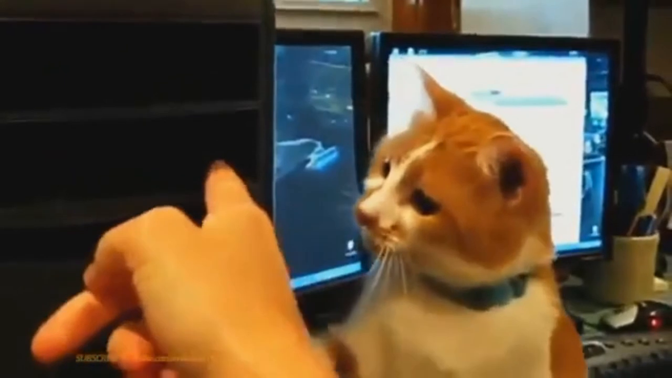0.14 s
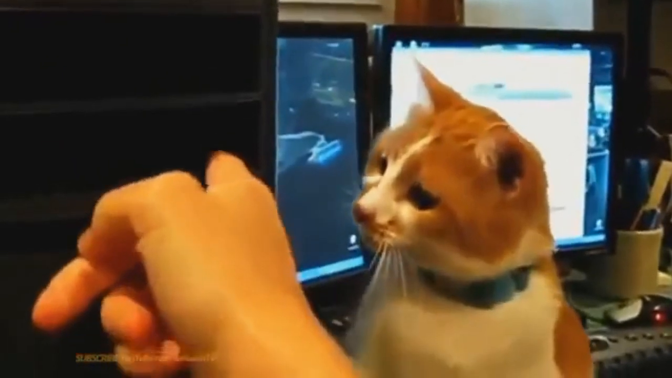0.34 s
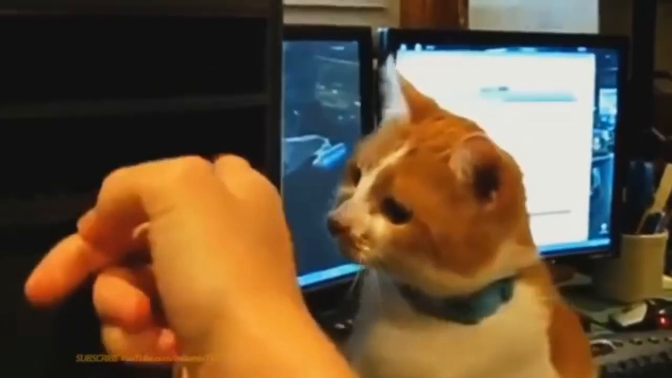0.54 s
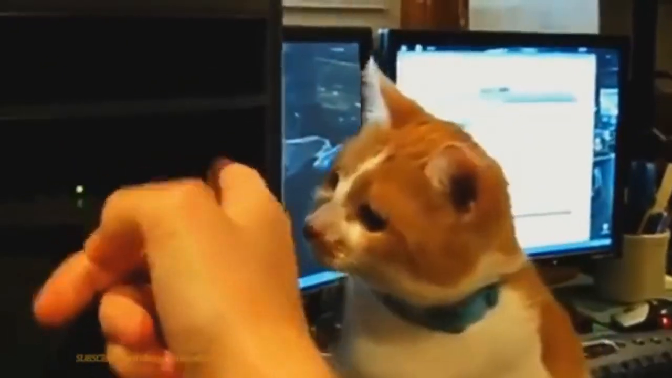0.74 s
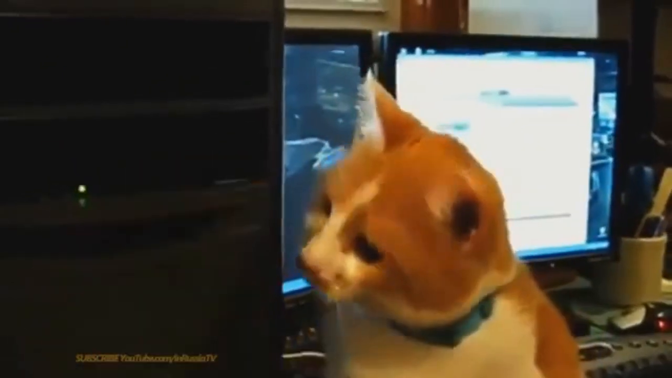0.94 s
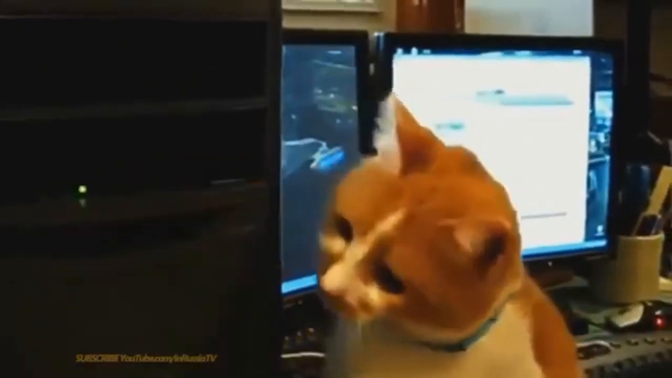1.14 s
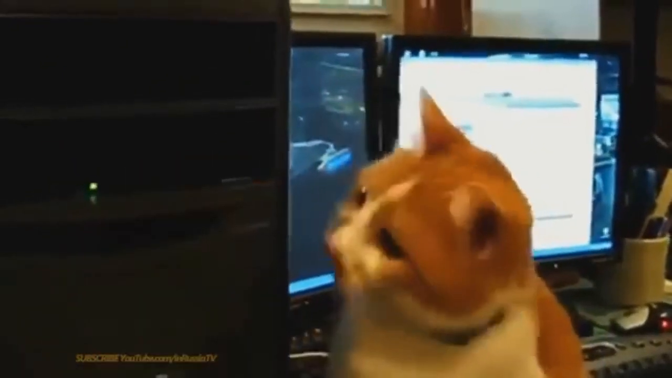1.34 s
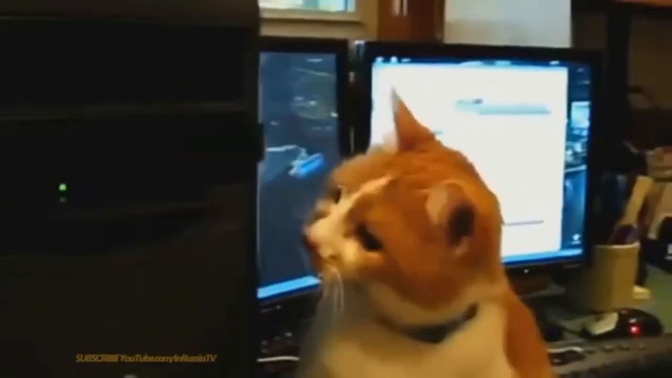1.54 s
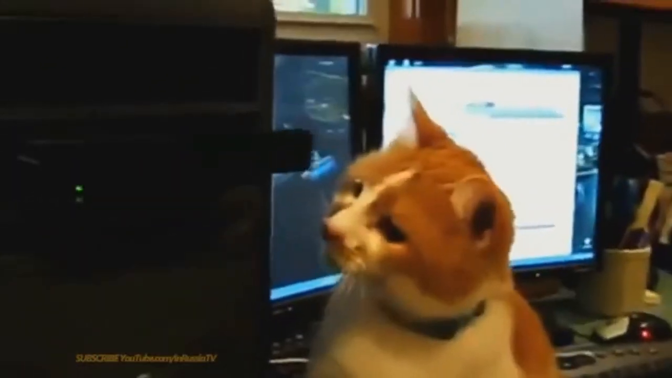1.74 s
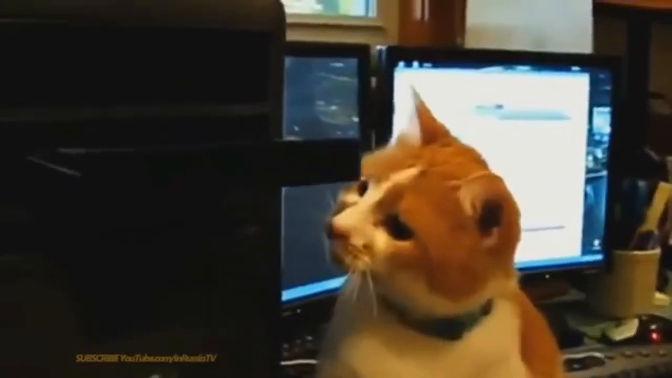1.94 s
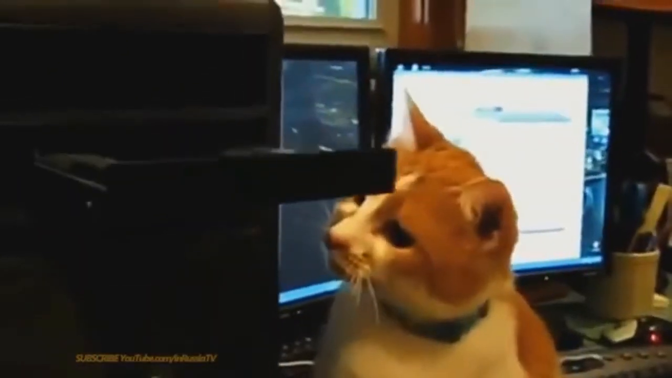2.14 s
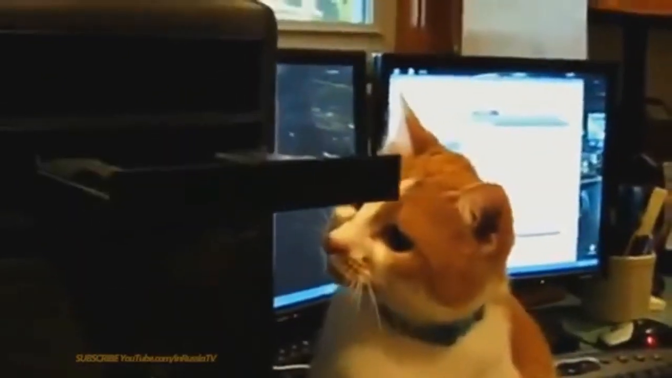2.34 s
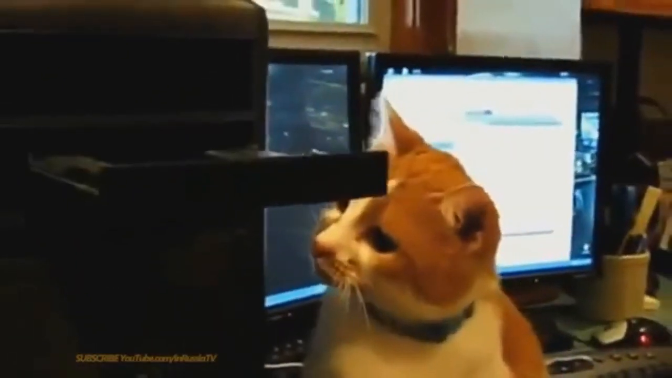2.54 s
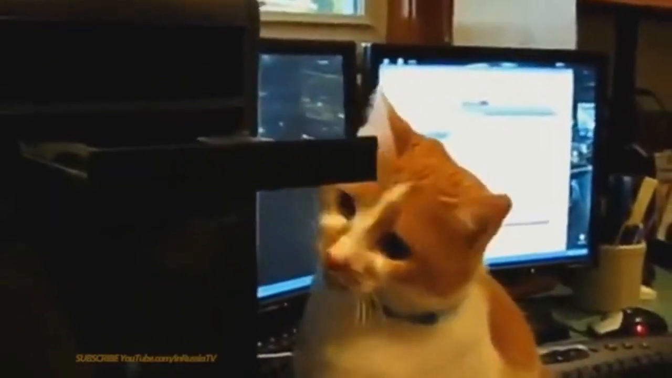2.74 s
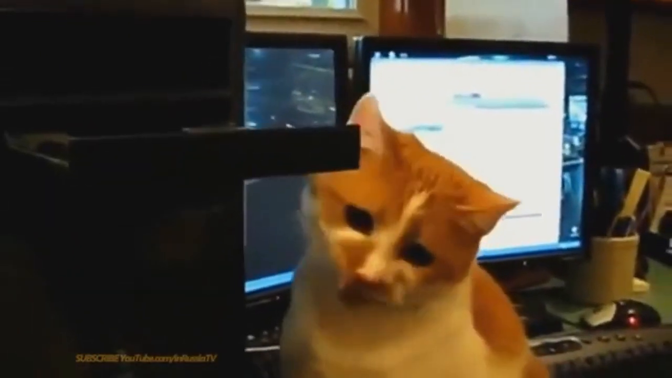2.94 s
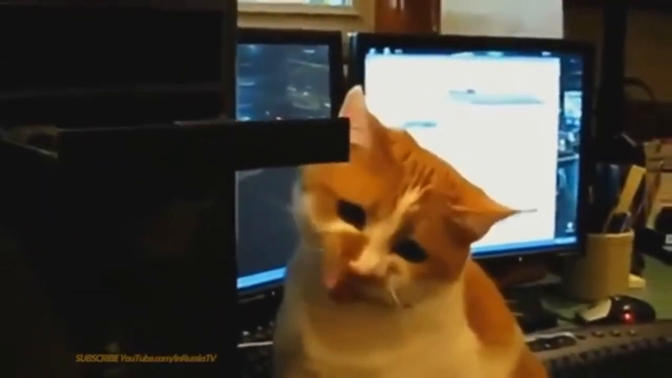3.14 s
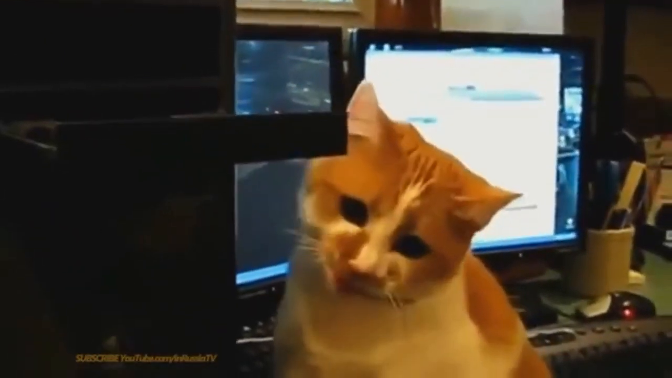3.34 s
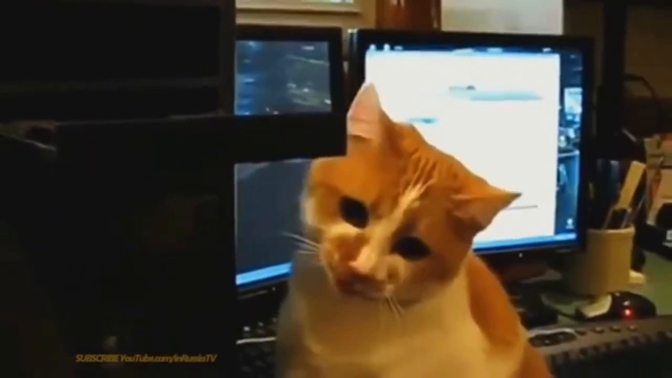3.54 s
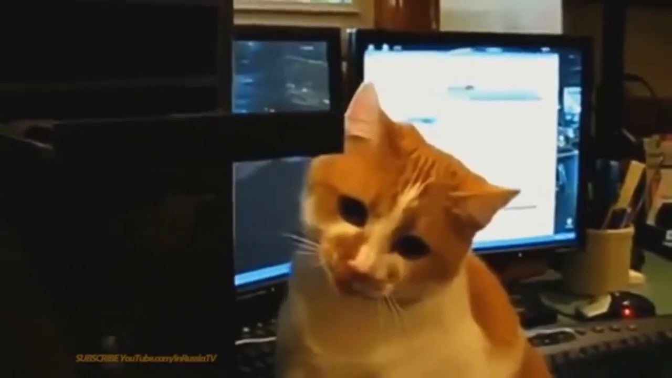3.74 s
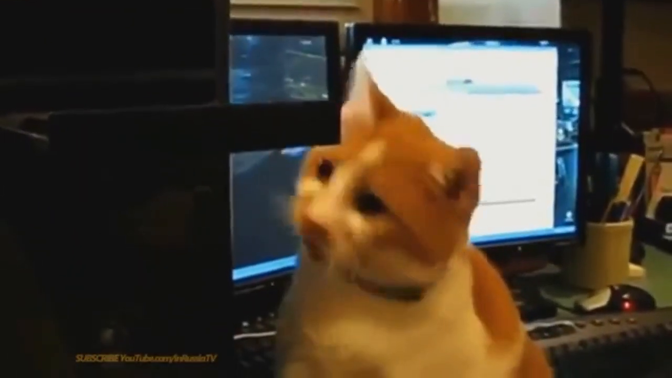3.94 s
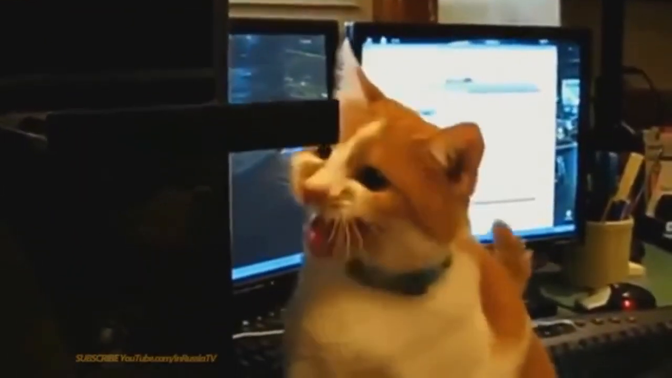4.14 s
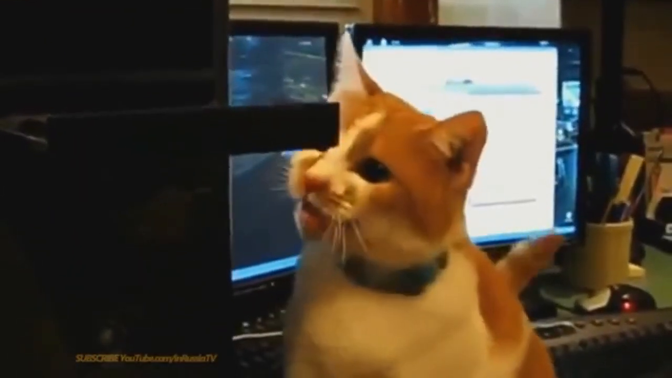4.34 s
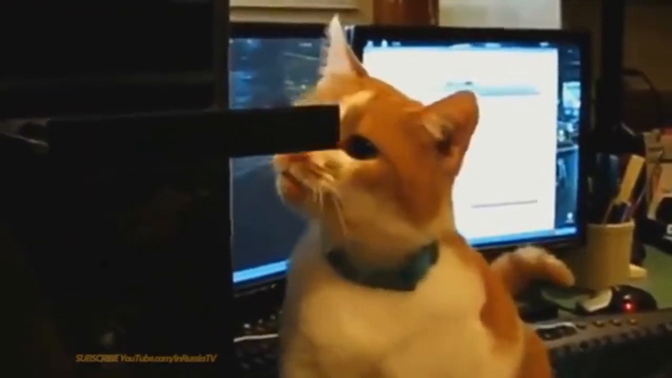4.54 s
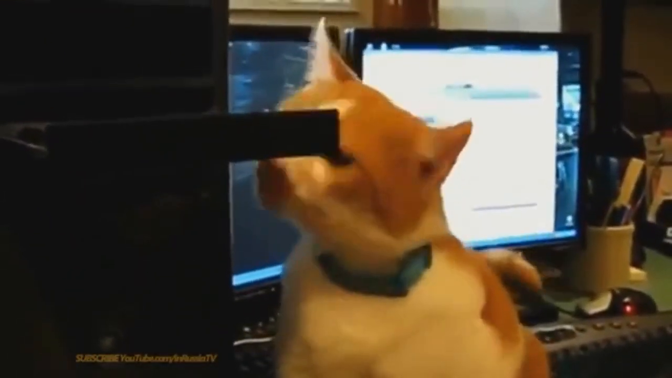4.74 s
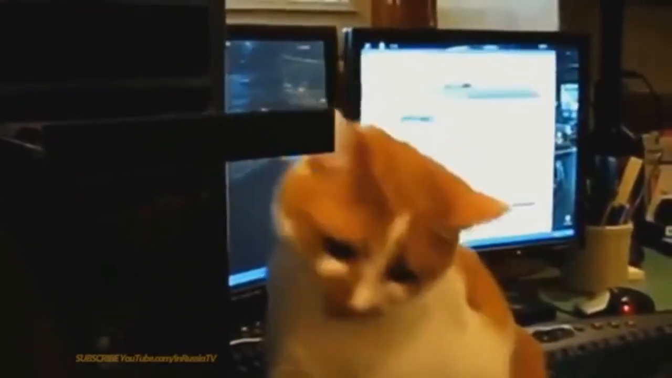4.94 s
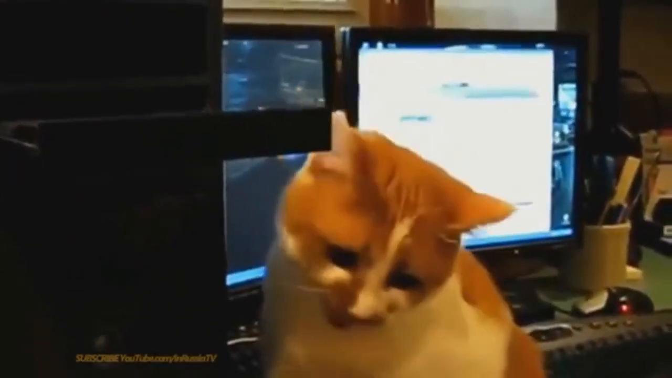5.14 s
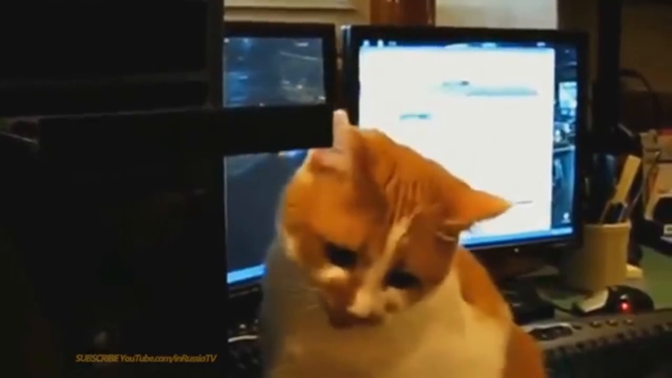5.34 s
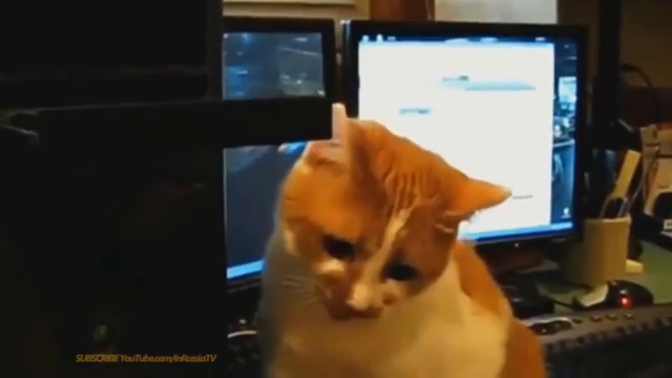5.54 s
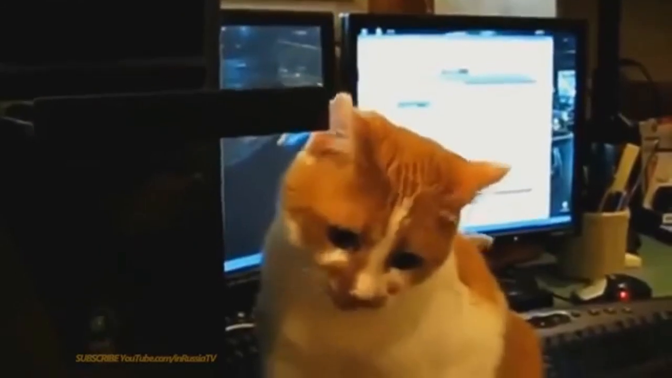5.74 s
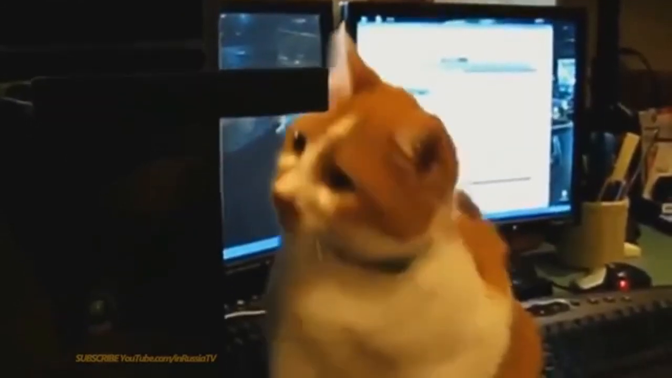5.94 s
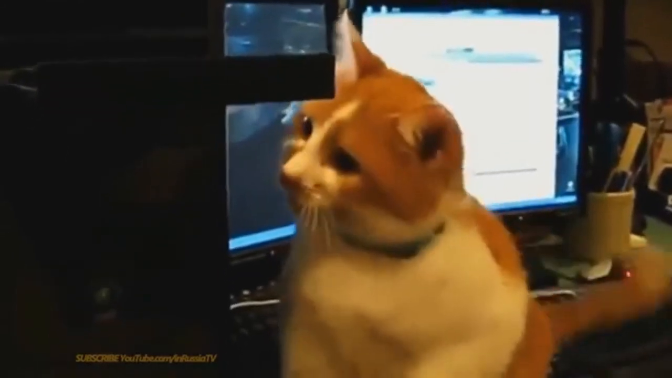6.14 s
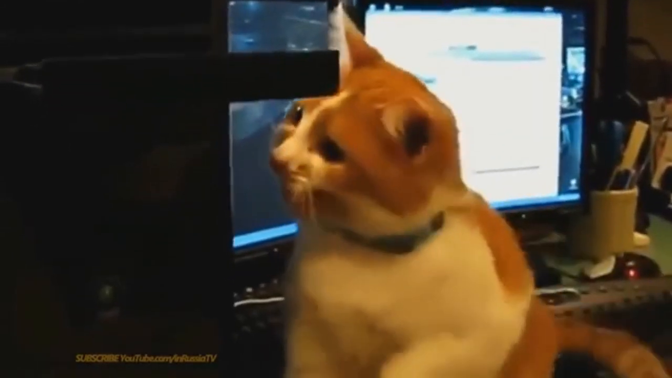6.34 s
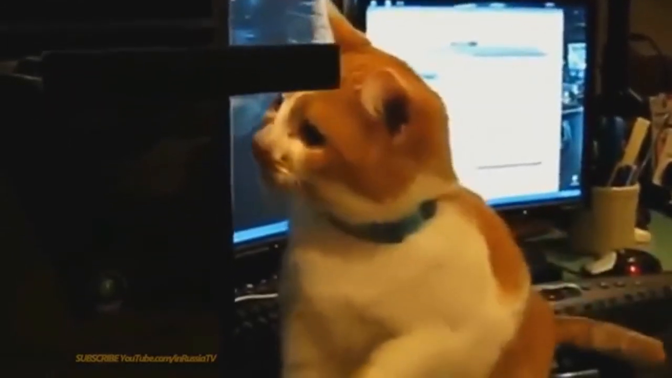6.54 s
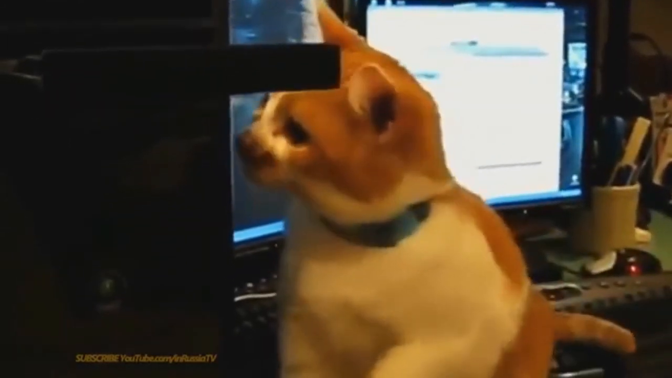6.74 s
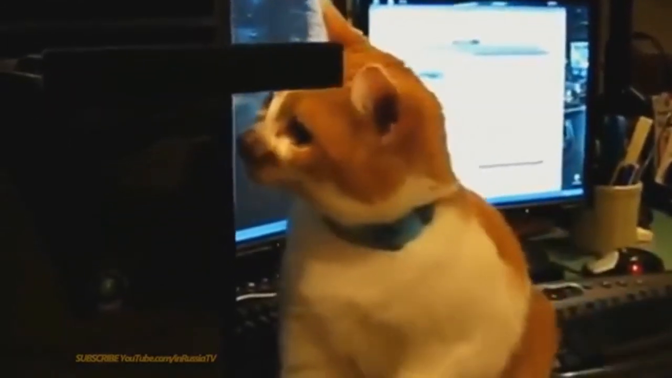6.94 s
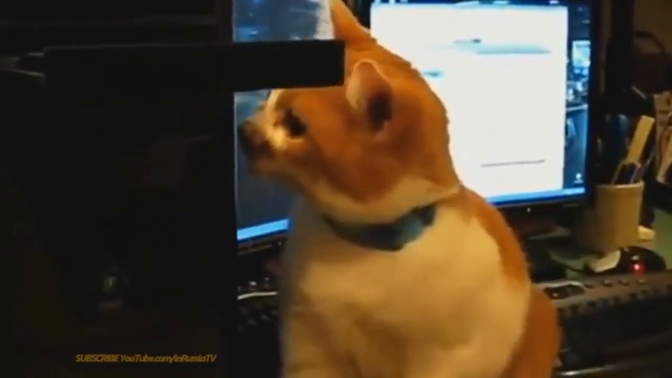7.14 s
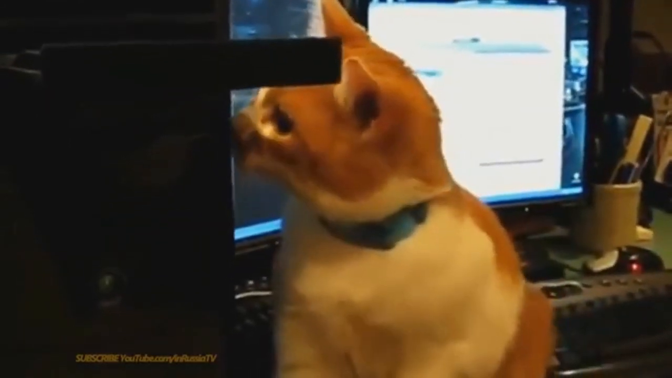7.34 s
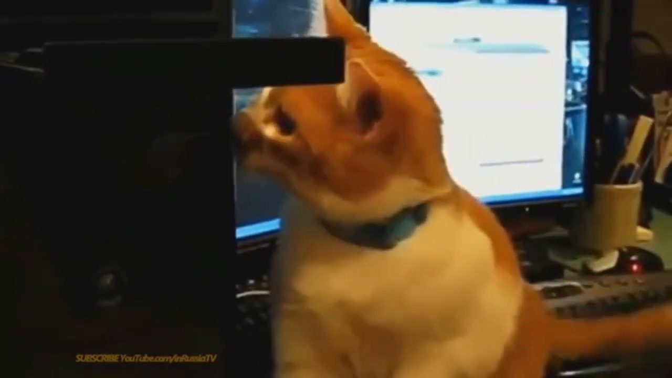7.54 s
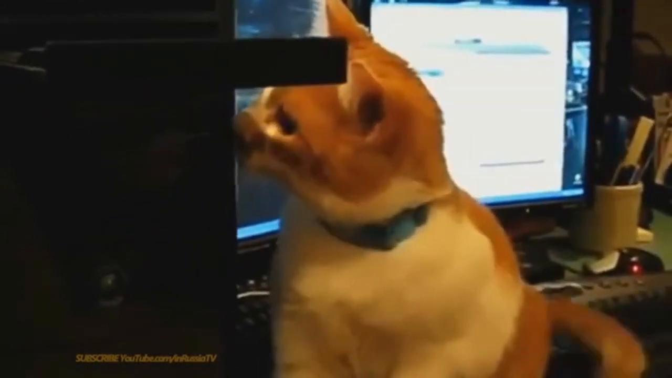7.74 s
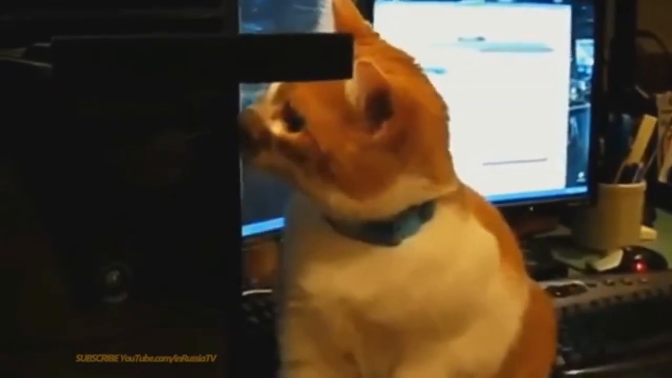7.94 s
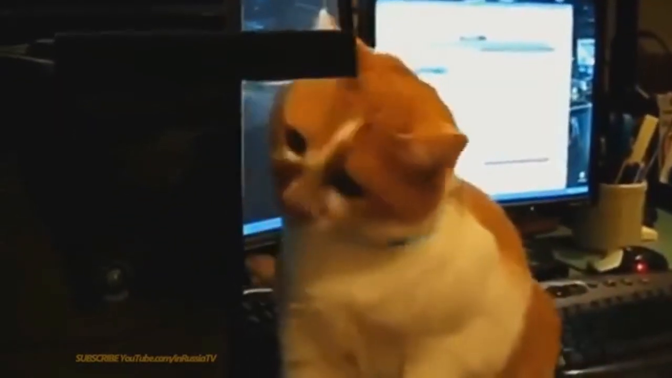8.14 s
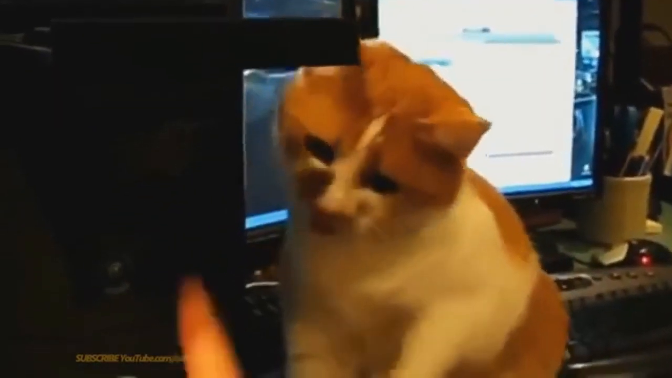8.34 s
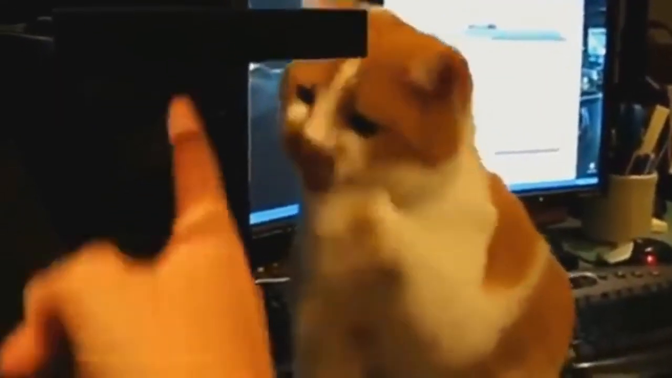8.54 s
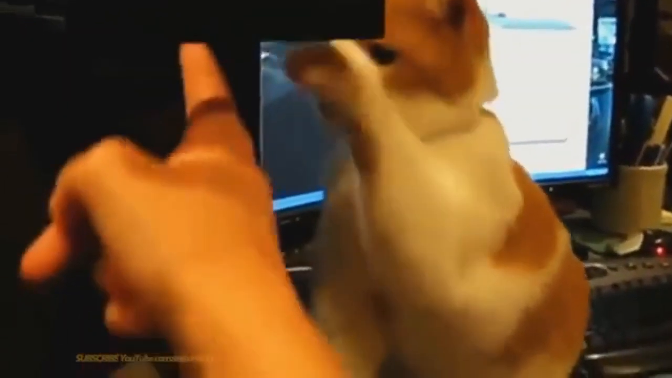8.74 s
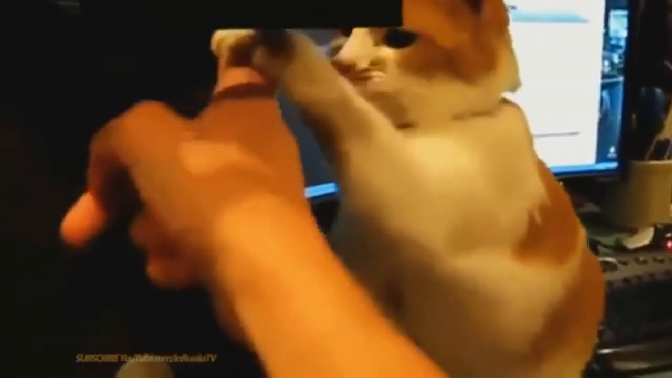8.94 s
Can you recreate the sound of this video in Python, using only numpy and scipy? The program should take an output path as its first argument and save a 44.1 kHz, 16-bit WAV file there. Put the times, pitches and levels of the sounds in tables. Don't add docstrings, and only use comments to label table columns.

```python
import sys
import numpy as np
from scipy import signal
from scipy.fft import rfft, irfft
from scipy.io import wavfile
from scipy.ndimage import uniform_filter1d

SR = 44100
rng = np.random.default_rng(int(sys.argv[2]) if len(sys.argv) > 2 else 0)


def how_loud(loudness_db):
    steps = np.asarray(loudness_db, float) / 20
    return 10 ** steps


def generate_wav(sig):
    pcm = np.round(np.clip(np.atleast_2d(sig).T, -1, 1) * 32767).astype(np.int16)
    wavfile.write(sys.argv[1], SR, pcm)


N = 395577

# (frequency [Hz], level per Hz [dB])
BREATH = [(1200, -21), (2500, 0), (3800, 2.5), (5500, -0.5), (6800, -10.5), (8500, -27)]


def evened(x):
    return x / np.sqrt(np.mean(abs(x) ** 2) + 1e-20)


def read(points, hz):
    f, value = np.transpose(points)
    return np.interp(np.log(hz + 1), np.log(f + 1), value)


def add(mix, s, sound):
    part = mix[round(s * SR):][:len(sound)]
    part += sound[:len(part)]


def coloured(size, points):
    hz = np.fft.rfftfreq(size, 1 / SR)
    return evened(irfft(rfft(rng.standard_normal(size)) * how_loud(read(points, hz)), size))


def wander(size, width_hz):
    step = rng.standard_normal(size) + 1j * rng.standard_normal(size)
    r = np.exp(-np.pi * width_hz / SR)
    return evened(signal.lfilter([1], [1, -2 * r, r * r], step))


def ring(hz, centre_hz, width_hz):
    return 1 / (1 + 2j * (hz - centre_hz) / width_hz)


def mew(rows, nose_db, upper_db, late_db, fade_db, palate_db):
    s, *columns = np.transpose(rows)
    t = np.arange(s[0], s[-1], 1 / SR)
    size, age = len(t), t - s[0]
    hz, chest_db, open_db, mouth_hz = (np.interp(t, s, c) for c in columns)
    mouth_db = chest_db + open_db
    nose_db = chest_db + nose_db - 0.32 * open_db + 10 * np.exp(-age / 0.037)
    upper_db = upper_db + 0.69 * (mouth_db + 30.5) + fade_db * age + late_db * np.exp(-age / 0.012)
    upper_hz = 4600 - 20 * open_db

    settling = np.exp(-age / .02)
    tremor = (0.0061 + 0.026 * settling) * wander(size, width_hz=126.0).real
    hz = hz * (1 + tremor + .008 * np.exp(-age / .004))
    order = np.arange(1, 13)[:, None]
    tone_hz = order * hz

    lips = 1 / (1 + (tone_hz / (1.35 * mouth_hz)) ** 12)
    mouth = ring(tone_hz, mouth_hz, 1180) ** 2 * lips * np.isin(order, [3, 4])
    sign = (-1.) ** order
    upper = abs(ring(tone_hz, upper_hz, 1300)) ** 2 * sign
    raised = 1 - .9 * np.exp(-age / .12)
    upper += raised * how_loud(palate_db) * abs(ring(tone_hz, 6400, 1100)) * sign
    voice_top = 1 / (1 + (tone_hz / 7000) ** 12) + how_loud(-6) * (tone_hz > 8300)
    upper *= voice_top * (order > 4)

    gains = how_loud(mouth_db) * mouth / np.linalg.norm(mouth, axis=0)
    gains = gains - how_loud(upper_db) * upper / np.linalg.norm(upper, axis=0)
    chest_rise = 1 - .5 * np.exp(-age / .008)
    gains += how_loud(chest_db) * chest_rise * (order == 1) + how_loud(nose_db) * (order == 2)
    waver = np.array([wander(size, width_hz=25.0).real for _ in order])
    gains *= how_loud(2.5 * (order > 1) * waver)
    unsteady = .09 + .3 * settling + .2 * (order == 2) + .08 * (order > 4)
    shimmer = 1 + unsteady * np.array([wander(size, width_hz=210.0) for _ in order])
    pulses = np.exp(2j * np.pi * order * np.cumsum(hz) / SR)
    voice = np.sqrt(2) * (gains * shimmer * pulses).sum(0).real

    leak = how_loud(mouth_db) * (how_loud(-21) + how_loud(-10) * settling) * coloured(size, BREATH)
    fade = np.clip(np.minimum(age / .003, (s[-1] - t) / .004), 0, 1)
    return s[0], (leak - voice) * fade


def mews(near):
    # (time [s], pitch [Hz], effort [dB], mouth opening [dB], mouth ring [Hz])
    faint = [(0.0, 825, -60, -2, 2850), (.08, 798, -54, -1, 2850), (.13, 800, -58, -4, 2850),
             (.2, 835, -52, -11, 2850), (.25, 762, -64, 4, 2850)]
    first = [(3.3025, 1035, -37, 14, 3580), (3.311, 1026, -35, 12, 3600), (3.32, 967, -31, 7, 3430),
             (3.365, 957, -32, 0.5, 3680), (3.388, 921, -34.5, 5, 3900), (3.465, 903.5, -37.5, -4, 3950),
             (3.553, 884, -32, -12.5, 2900), (3.60, 841, -42, -7, 2600), (3.68, 782, -42.5, -24, 2800)]
    second = [(4.331, 992, -34, 12.5, 3300), (4.35, 944, -32, 5.5, 3320), (4.375, 937, -32, 12.5, 3600),
              (4.405, 915, -35.5, 8.5, 3380), (4.428, 874, -31.5, 3, 3420), (4.465, 868, -39, 12, 3200),
              (4.5, 846, -43, 4, 3100), (4.535, 836, -35, -9, 2800), (4.575, 755, -48, -2, 2656)]
    third = [(5.2454, 972, -36, 11, 3400), (5.262, 928, -35, 16, 3380), (5.315, 901, -35, 6, 3500),
             (5.345, 885, -31, 0, 3350), (5.45, 876.5, -35.5, 2, 3250), (5.52, 883, -31, -10, 2970),
             (5.61, 845, -42, -3.5, 2850), (5.68, 854, -37.5, -8, 2600), (5.78, 797, -43, -11, 2797)]
    fourth = [(6.4995, 950, -31, 5.5, 3500), (6.515, 931, -33.5, 8, 3050), (6.55, 886, -32, 7.5, 3280),
              (6.57, 867, -31.5, 6.5, 3080), (6.595, 841, -43.5, 15.5, 2950), (6.637, 826, -35.5, 7, 2750),
              (6.69, 782, -48.5, 18, 2100), (6.715, 746, -46, 8, 2000), (6.74, 696, -55, -14, 2003)]
    last = [(8.46, 940, -31, 8, 3200), (8.489, 950, -26, 2, 3400), (8.515, 913.4, -35, 8, 3550),
            (8.625, 910, -38, 10, 3600), (8.69, 934, -31, -5, 3300), (8.775, 942, -28, -4.5, 3170),
            (8.8, 895, -31.5, -16.5, 3250), (8.88, 881, -27.5, -15, 2900), (8.92, 759, -52, 5, 2680)]
    # (nose tone over effort [dB], upper ring [dB], its late start [dB],
    # its fading [dB/s], palate ring [dB])
    colours = [
        (6, -48, 0, 0, -9),
        (-15, -35, 0, -24, -9),
        (-13, -38, -8, 0, -5),
        (-16, -42, -20, -1, -6),
        (-12, -47, -12, -17, -3),
        (-16, -33, -4, -24, -12),
    ]
    for rows, colour in zip([faint, first, second, third, fourth, last], colours):
        add(near, *mew(rows, *colour))


def gasps(near):
    # (start [s], end [s], level [dB])
    breaths = [
        (3.234, 3.312, -46),
        (4.239, 4.343, -45),
        (5.139, 5.244, -46.5),
        (6.42, 6.488, -50),
        (8.405, 8.47, -48),
    ]
    for start, end, db in breaths:
        size = round((end - start) * SR)
        swell = np.sin(np.linspace(0, 2.4, size))
        add(near, start, how_loud(db) * swell * coloured(size, BREATH))


def burst(t60, rings, crack_db, rise=0.0008):
    t, hz = np.arange(2048) / SR, np.fft.rfftfreq(4096, 1 / SR)
    ticks = rng.standard_normal((2, 2050)) * how_loud(4.2 * rng.exponential(1, (2, 2050)))
    onset = np.minimum(t / rise, 1)
    blow = ticks[0, 2:] * how_loud(-60 * t / t60) * onset ** 2
    small = (1j * hz / (500 + 1j * hz)) ** 2
    body = irfft(rfft(blow, 4096) * small * sum(how_loud(db) * ring(hz, f, w) ** 2 for f, w, db in rings))
    crack = np.diff(ticks[1], 2) * how_loud(-60 * t / (.55 * t60)) * onset
    crack = irfft(rfft(crack, 4096) * ring(hz, 10500, 7000) ** 2)
    crack = crack / abs(crack).max()
    sound = body / abs(body).max() + how_loud(crack_db) * crack
    return sound / abs(sound).max()


def lip_smacks(near):
    # (time [s], peak level [dB], ring [Hz], decay t60 [s])
    smacks = [
        (4.145, -43, 11100, .015),
        (7.99, -43, 10800, 0.018),
        (8.31, -31, 6240, 0.014),
        (8.339, -24.5, 9060, 0.0083),
        (8.358, -34, 14600, .013),
    ]
    for s, db, hz, t60 in smacks:
        add(near, s, how_loud(db) * burst(t60, [(hz, 2200, 0)], crack_db=-4))


def click(low_hz, high_hz, high_db, crack_db):
    t = np.arange(4096) / SR
    low = np.sin(2 * np.pi * low_hz * t) * how_loud(-60 * np.maximum(t - .001, 0) / 0.0026)
    modes = [(0.92, -1.5), (.78, -11), (1.16, -3), (1.55, -9), (1.9, -11)]  # (ratio, dB)
    high = sum(np.sin(2 * np.pi * ratio * high_hz * t) * how_loud(high_db + db - 60 * t / .011)
               for ratio, db in modes)
    rings = [(1.22 * low_hz, 3000, 0), (high_hz, 4000, high_db), (1400, 1400, -6)]
    scatter = burst(0.027, rings, crack_db, rise=0.00012)
    sound = low + high + how_loud(-1.5) * scatter
    sound = signal.lfilter([1, -1], [1, -.97], sound)
    return sound / abs(sound).max()


def button(near):
    # (time [s], peak level [dB], low mode [Hz], high mode [Hz], high mode level [dB])
    snaps = [
        (0.7852, -8, 3150, 6250, 3),
        (0.8896, -13, 2750, 6270, -15),
    ]
    for s, db, low_hz, high_hz, high_db in snaps:
        add(near, s, how_loud(db) * click(low_hz, high_hz, high_db, crack_db=-16 - high_db))


def knock(t60, low_hz, high_hz, bright_db):
    rings = [(low_hz, 800, 0), (high_hz, 1200, .5 * bright_db + 3), (2500, 4500, -11)]
    t60 = t60 - .0007 * max(bright_db, -40)
    return burst(t60, rings, bright_db + 4.0)


def latch(near):
    # (time [s], peak level [dB], ring [Hz], second ring [Hz], brightness [dB])
    rattle = [(0.997, -29, 826, 3280, -11), (1.0212, -26, 1840, 3300, -16), (1.4378, -23, 1900, 4430, -18),
              (1.451, -19, 2320, 3080, -9), (1.4555, -16, 1000, 3130, -55), (1.462, -17, 900, 3550, -55),
              (1.468, -22, 900, 3550, -55), (1.474, -14, 2620, 3660, -14), (1.481, -16, 1920, 3900, -18),
              (1.49, -25, 1100, 3900, -25), (1.5076, -23, 991, 3020, -25), (1.519, -22, 1550, 3670, -26),
              (1.53, -23, 1600, 3170, -31), (1.536, -21, 1050, 3180, -27), (1.5606, -18, 1520, 5000, -5),
              (1.564, -19.5, 1060, 3000, -37), (1.574, -25, 2000, 4500, -36),
              (1.5804, -17, 2140, 4400, -27), (1.5845, -17, 1150, 2970, -32)]
    for s, db, *colour in rattle:
        add(near, s, how_loud(db) * knock(0.024, *colour))


def stop_ticks(near):
    # (time [s], peak level [dB], ring [Hz], second ring [Hz], brightness [dB])
    knocks = [
        (2.3227, -34, 1040, 3500, -29),
        (2.346, -26, 1310, 4650, -30),
        (2.358, -28, 1180, 2840, -22),
        (2.411, -34, 947, 3000, -24),
        (3.0556, -31.5, 816, 5600, -11),
        (3.1127, -36, 816, 3210, -30),
        (5.0355, -33, 813, 4600, -16),
        (7.9896, -29.5, 829, 3210, -24),
    ]
    for s, db, *colour in knocks:
        add(near, s, how_loud(db) * knock(0.04, *colour))


def tray(near):
    # (frequency [Hz], level per Hz [dB])
    hiss = [(800, 14), (2500, 26), (4000, 13.5), (6500, 11.5), (9000, 1), (12300, 10.5), (15000, 2)]
    start_s, stop_s = 1.428, 2.42
    run_s = stop_s - start_s
    s = [0, 0.078, 0.078 + .122, run_s, run_s + 0.044]
    db = [-52, -39.5, -46, -47.5, -62]
    t = np.arange(0, s[-1], 1 / SR)
    chatter = 1 + .25 * wander(len(t), width_hz=60.).real
    sound = how_loud(np.interp(t, s, db)) * chatter * coloured(len(t), hiss)
    add(near, start_s, sound * signal.windows.tukey(len(t), .1))


def hand_thuds(near):
    # (time [s], peak level [dB], ring [Hz], decay t60 [s])
    thuds = [
        (0.657, -33, 1490, 0.06),
        (0.944, -26, 1500, 0.07),
        (0.964, -27, 1000, 0.07),
        (1.059, -24.5, 1200, 0.03),
    ]
    for s, db, hz, t60 in thuds:
        add(near, s, how_loud(db) * burst(t60, [(hz, 1300, 0)], crack_db=-40, rise=0.0014))


def room(x, t60=0.17, tail_db=-14):
    # (delay [s], level [dB])
    echoes = [
        (.0021, -27),
        (.0047, -23),
        (.009, -26),
    ]
    t = np.arange(SR // 2) / SR
    taps = rng.standard_normal(len(t)) * how_loud(-60 * t / t60) * (t > .004)
    taps = signal.lfilter([1], [1, -.3], taps)
    taps *= how_loud(tail_db) / np.linalg.norm(taps)
    taps[0] = 1
    for k, (s, db) in enumerate(echoes):
        taps[round(s * SR)] += (-1) ** k * how_loud(db)
    return signal.fftconvolve(x, taps / np.linalg.norm(taps))[:N]


def fan_rush():
    # (frequency [Hz], level per Hz [dB])
    air = [(15, -53), (25, -25), (103, -17.5), (243, -3.5), (301, -10.5), (373, -11.5), (604, -5.5),
           (811, -4.5), (2200, -15), (3260, -16), (6000, -28), (9000, -29.5), (12700, -35.5),
           (14400, -33.5)]
    # (frequency [Hz], width [Hz], lift [dB])
    case = [(253.8, 22.6, 10), (330, 79, 7.5), (531.6, 12.3, 11.5), (1026, 28, -6), (3280, 450, -1.5),
            (4600, 72, -2.5), (8860, 91, -3)]
    frames, hz = N // 512 + 5, np.fft.rfftfreq(2048, 1 / SR)
    a, b, patches = rng.standard_normal((frames, 1025, 3)).T
    patches = evened(uniform_filter1d(uniform_filter1d(patches, 20, 0), 8, 1))
    colour_db = read(air, hz) + sum(db * abs(ring(hz, f, w)) ** 2 for f, w, db in case)
    spectra = (a + 1j * b) * how_loud(colour_db[:, None] + 0.9 * patches)
    rush = signal.istft(spectra, nperseg=2048, noverlap=1536)[1][:N]
    return how_loud(-39 - 1.37) * evened(rush)


def fan_tones():
    # (frequency [Hz], rms level [dB])
    blades = [(409.1, -62), (489.9, -58.5), (716.0, -52.5), (818.3, -49), (925.9, -65), (952.8, -56),
              (1023, -57.5), (1109, -59), (1227, -62), (1432, -61), (1637, -60.5), (1841, -60),
              (2627, -62.5)]
    # (frequency [Hz], rms level [dB])
    bearings = [(2552, -66), (3278, -66), (3348, -63), (3870, -64), (4091, -72), (4603, -59.5), (5319, -74),
                (5432, -74), (5905, -70), (8527, -66), (8646, -70), (9254, -73), (11520, -73)]
    # (centre [s], half length [s], lift [dB])
    coil_swells = [
        (.6, .5, 12),
        (2.5, .8, 6.5),
        (6.3, .4, 7),
        (8.0, 0.54, 12.5),
        (8.97, .25, 8),
    ]
    t = np.arange(N) / SR
    flutter = [wander(N, width_hz=14.5) for _ in range(4)]
    coil_db = -63 + sum(db * np.exp(-((t - s) / half) ** 2) for s, half, db in coil_swells)
    out = np.zeros(N)
    for k, (f, db) in enumerate(blades + bearings + [(3209, coil_db)]):
        steady = 1 / (1 + (f / 4200) ** 6)
        depth = .2 * steady + .7 * (1 - steady)
        waver = steady + depth * np.roll(flutter[k % 4], k * 9001)
        tone = np.exp(2j * np.pi * (f * t + rng.random()))
        out += how_loud(db) * np.sqrt(2) * (waver * tone).real
    return out


def scene():
    near = np.zeros(N)
    for source in [mews, gasps, lip_smacks, button, latch, stop_ticks, tray, hand_thuds]:
        source(near)
    return (room(near) + fan_rush() + fan_tones())[None]


def top_cut(x):
    return signal.sosfilt(signal.butter(12, 17000, fs=SR, output="sos"), x)


def record(dry):
    notch_hz, notch_width_hz, edge_hz = 7890, 1690, 15080
    notched = signal.lfilter(*signal.iirnotch(notch_hz, notch_hz / notch_width_hz, SR), dry)
    notched = notched + how_loud(-78) * rng.standard_normal(dry.shape)
    lowpass = signal.firwin(1023, edge_hz, window=("kaiser", 9), fs=SR)
    low = signal.oaconvolve(notched, lowpass[None], "same")
    top = signal.sosfilt(signal.butter(8, 15900, fs=SR, output="sos"), notched - low)
    top_db = 10 * np.log10(abs(uniform_filter1d(top ** 2, 256)) + 1e-14)
    opened = uniform_filter1d(1. * (top_db > -53), 256)
    return top_cut(low + how_loud(-8) * opened * top)


dry = scene()
out = record(dry)
generate_wav(out)
```